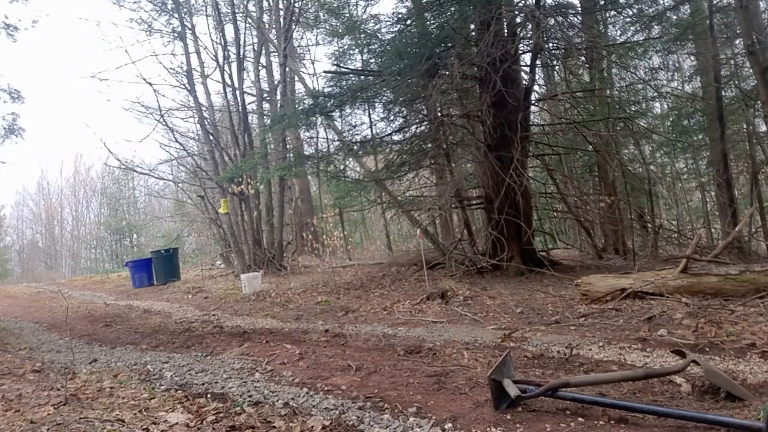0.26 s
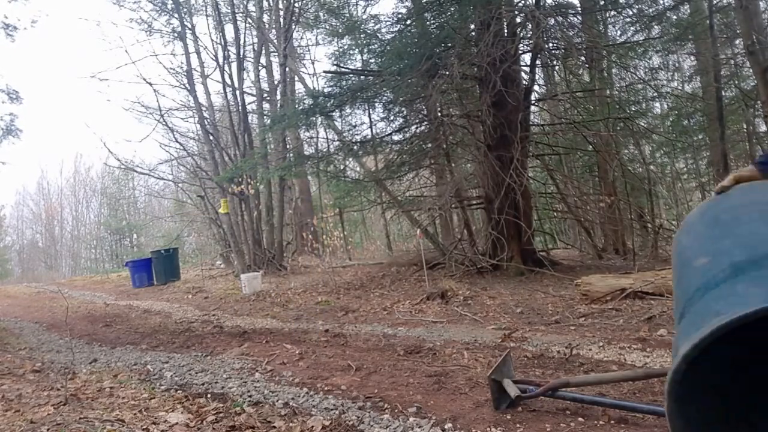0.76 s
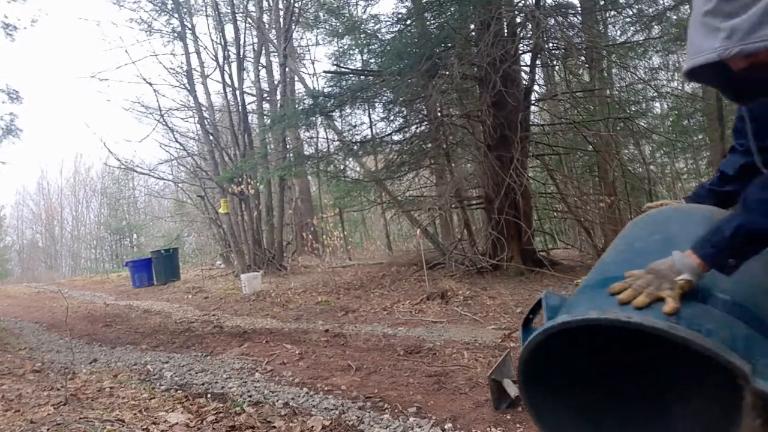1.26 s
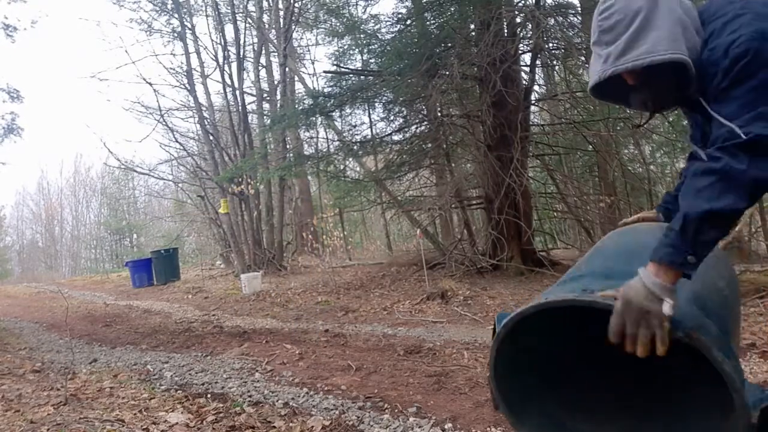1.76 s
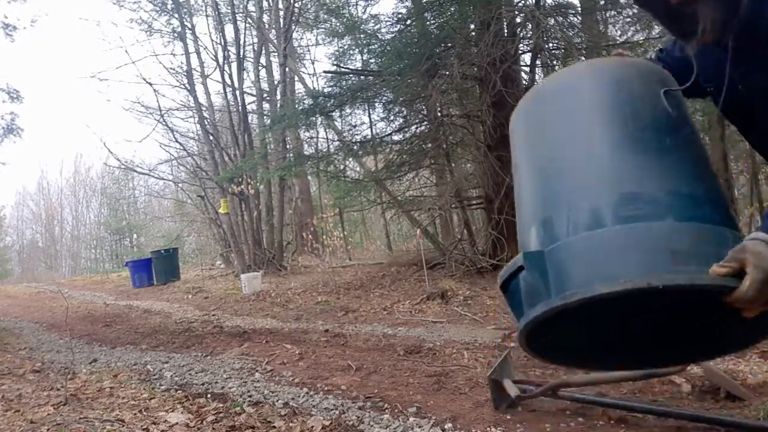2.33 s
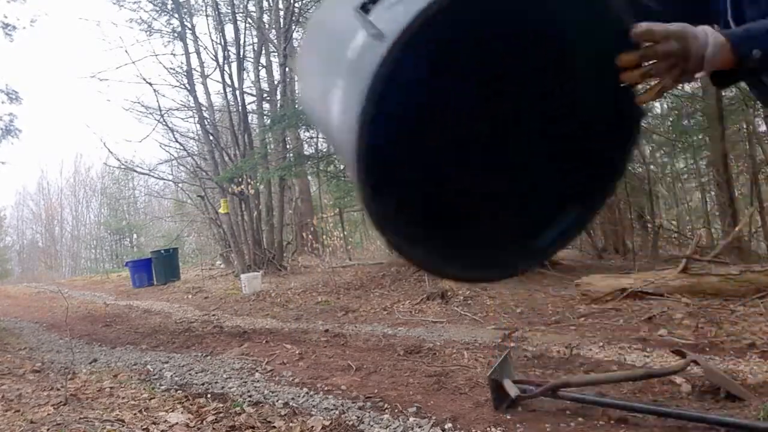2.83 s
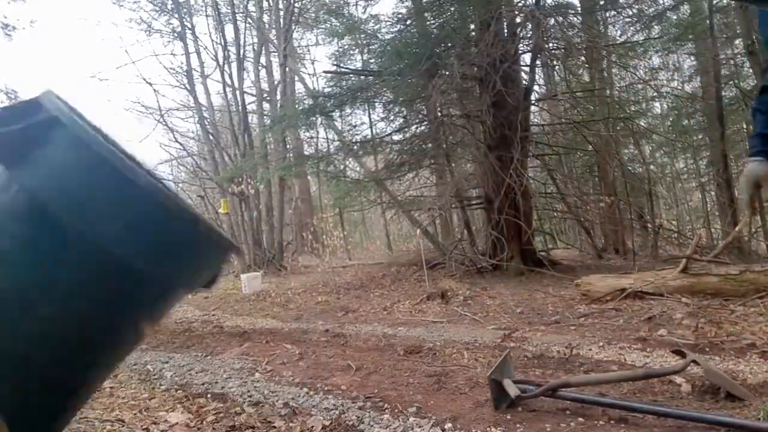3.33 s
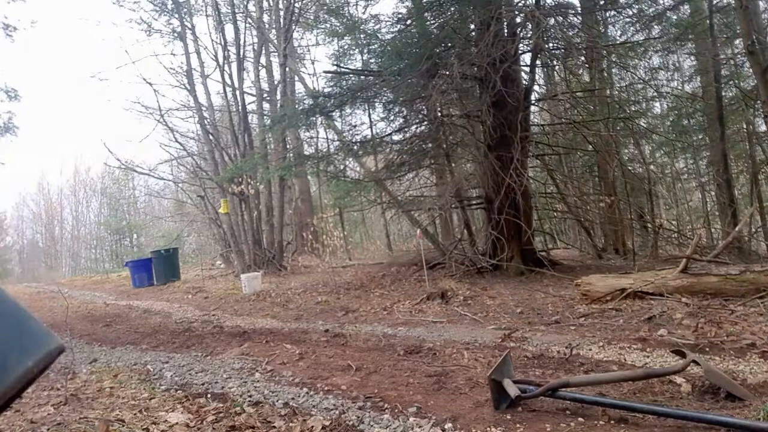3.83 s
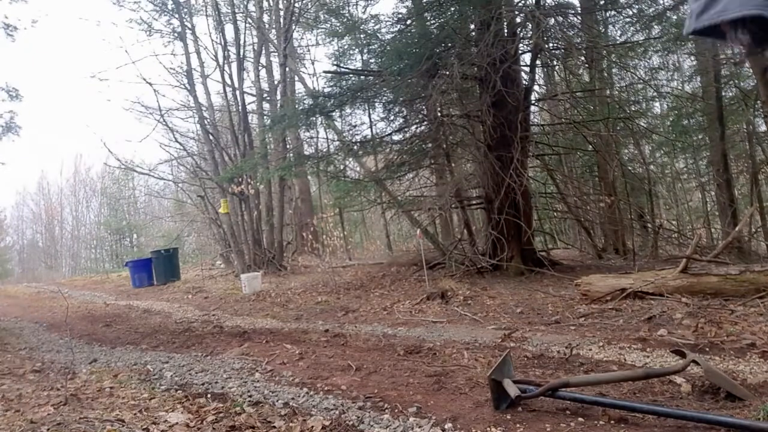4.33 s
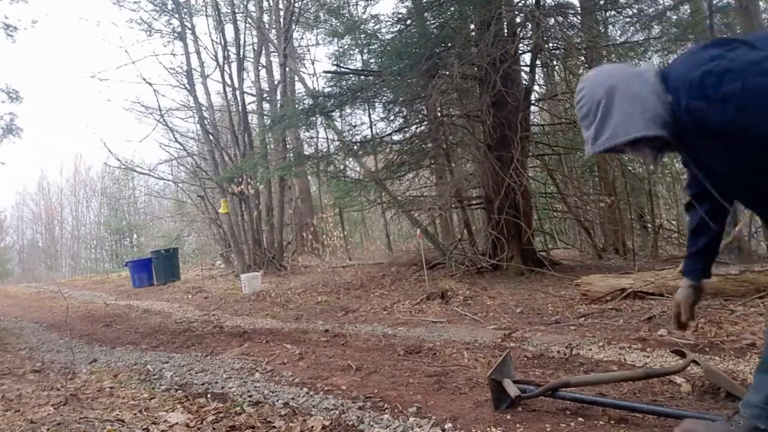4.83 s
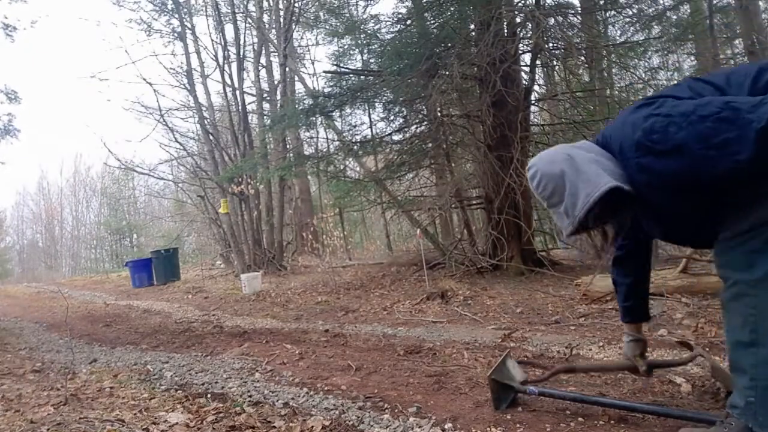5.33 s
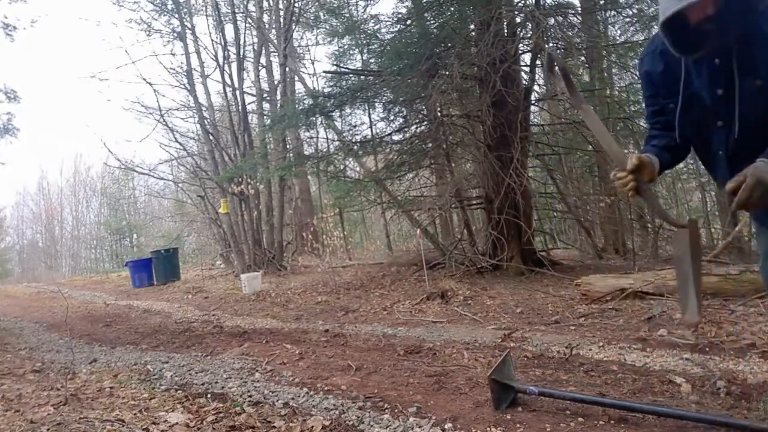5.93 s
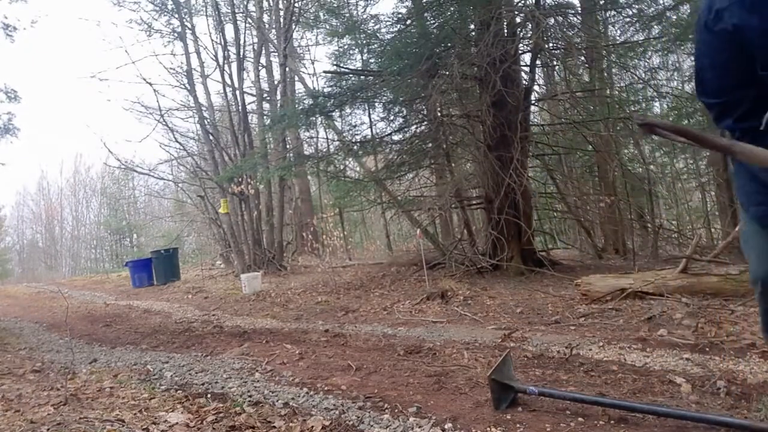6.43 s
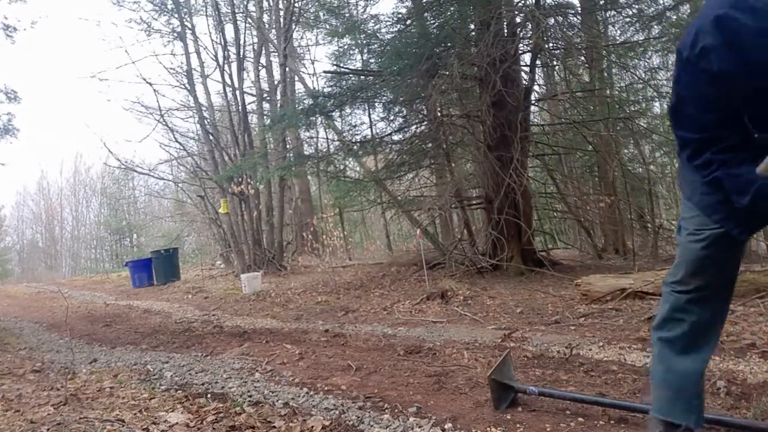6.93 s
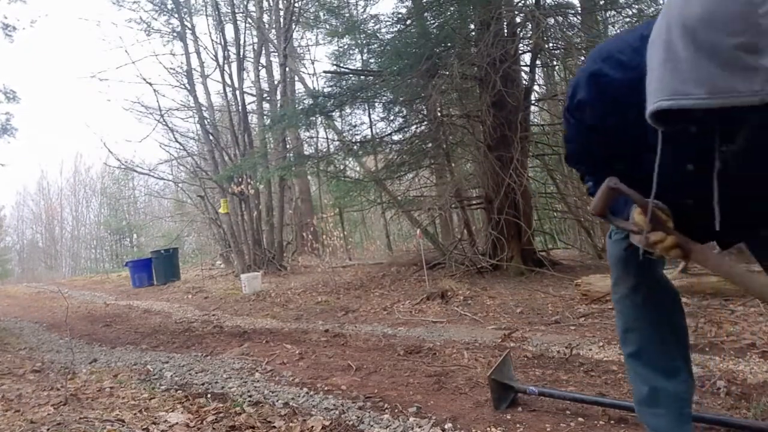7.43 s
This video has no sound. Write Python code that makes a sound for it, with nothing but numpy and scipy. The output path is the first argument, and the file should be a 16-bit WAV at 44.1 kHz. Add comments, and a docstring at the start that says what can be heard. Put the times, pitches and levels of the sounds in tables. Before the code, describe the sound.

Outdoors by woods, close stereo microphone. Gravel slides and drums inside a large plastic barrel, hissing out of its mouth for about two seconds. A short lull, then the barrel is thrown and lands with a loud hollow boom and slap. Dry leaves crackle under it and under boots, with small clicks. A shovel knocks in gloved hands, then stabs and scrapes gravel with ringing steel and pinging stones. Light wind underneath.

```python
"""A big plastic barrel is tipped and dragged so that gravel slides out, then it is tossed aside.
The gravel is thousands of tiny random impacts: some drum on the wall, others hiss out of the mouth.
The barrel lands with a boom of swelling notes and rolls on; crackling noise makes the leaves under it and the boots.
A steel shovel knocks, then stabs and scrapes through gravel: bursts of grit, ringing steel and pinging stones.
Behind it are light wind, puffs of air and a weak echo from trees; two microphone ports hear it all."""
import sys
import numpy as np
from scipy import signal
from scipy.fft import rfft, irfft, next_fast_len
from scipy.io import wavfile
from scipy.ndimage import map_coordinates

SR = 44100
rng = np.random.default_rng(int(sys.argv[2]) if len(sys.argv) > 2 else 0)


def persist_wave(psi):
    """Save psi, clipped to +-1, as 16-bit WAV."""
    counts = np.round(np.clip(psi, -1, 1) * 32767).astype(np.int16)
    wavfile.write(sys.argv[1], SR, np.atleast_2d(counts).T)


N = 339129  # length of the scene [samples]


# gravel sliding out, before each layer is lifted and flickers:
# (time [s], drumming level [dB], hiss level [dB])
POUR = [(0.0, -29, -34), (0.324, -50.5, -47.5), (0.434, -40.5, -47.5), (0.602, -34, -32.5),
        (0.686, -33.5, -30.5), (0.904, -28, -37), (1.062, -36, -41.5), (1.088, -31.5, -41),
        (1.19, -33.5, -38.5), (1.428, -22.5, -30.5), (1.66, -39.5, -38.5), (1.826, -52, -55.5),
        (1.88, -50.5, -58)]
# colour of the stones' hiss: (frequency [Hz], level [dB])
HISS = [(600, 0), (2200, -1), (3200, 0.5), (5800, 1), (7800, 7), (10500, -1), (14000, 1.5)]


def pour():
    """Gravel slides along the wall, which drums, and hisses out of the mouth as stones hit stones."""
    stones = chatter(grains(rate=8000, spread_db=5.5, scatter_ms=.06), t60=.012, share=.55)
    hiss = unit(through(stones, response(HISS)))
    hiss_flicker = amp(6 + 1.2 * wobble(41.57))
    drum_flicker = amp(2.0 + 1.4 * wobble(34.24))
    drum = drumming(t60=0.17, ring_db=-2.5)
    return level(POUR, 2) * hiss_flicker * hiss + level(POUR, 1) * drum_flicker * drum


# colour of small taps on the hollow barrel: (frequency [Hz], level [dB])
HOLLOW = [(50, -15), (115, -1), (180, -11), (300, -3), (520, -5), (780, -4), (1050, -9.5), (1500, -11),
          (2300, -15.5), (5000, -26.5)]
# pitches at which the barrel's wall rings: (frequency [Hz], relative level [dB])
WALL_MODES = [(295, 1), (455, 7), (520, 5.5), (585, 6.5), (712, 3.5), (880, 1), (1250, -4), (1560, 1.5)]
WALL_DRIFT_S = .003  # size of the random time shifts that bend the wall's pitch [s]


def drumming(t60, ring_db):
    """Small stones drum on the barrel; its ringing pitches drift as the wall flexes."""
    taps = chatter(grains(rate=1100, spread_db=2.0, scatter_ms=0.026), t60=0.048, share=0.036)
    slips = grains(rate=350, spread_db=4, scatter_ms=.026)
    steady_ring = through(slips, ringing(WALL_MODES, t60))
    # reading the ring a little early or late bends its pitch
    now = np.arange(N)
    flexed = now + WALL_DRIFT_S * SR * wobble(8)
    ring = np.array([np.interp(flexed, now, port) for port in steady_ring])
    hollow = unit(through(taps, response(HOLLOW)))
    return unit(hollow + amp(ring_db) * unit(ring))


# the plastic wall slapping the ground or being shoved: (time [s], level [dB], time to fall 60 dB [s])
SLAPS = [(2.825, -44, 0.068), (3.1973, -30, 0.12), (3.2042, -14, 0.13), (3.25, -27.5, 0.24),
         (3.588, -35, 0.15), (4.224, -36, 0.26)]
# colour of a slap on plastic: (frequency [Hz], level [dB])
SLAP_COLOUR = [(90, -22.5), (330, 0.5), (450, -14.5), (620, -9), (900, -20), (1400, -19.5), (2200, -24),
               (4000, -22.5), (7500, -27.5), (10500, -41), (14000, -34)]


def slaps():
    """The plastic wall slaps down: a sharp contact, then noise that dies away."""
    return blows(SLAPS, SLAP_COLOUR, snap=2.1, rattle=0.15)


# the air in the barrel booms as the wall is pushed:
# (time [s], peak level [dB], pitch [Hz], time to swell [s])
BOOMS = [(1.088, -24, 113, 0.01), (1.287, -24, 112.6, 0.023), (2.823, -18.5, 102, .011),
         (2.867, -23.5, 99, 0.0085), (3.2038, -5, 115.2, 0.021), (3.267, -4.5, 115, 0.01),
         (3.327, -21, 117.3, 0.017), (3.597, -30.5, 119, 0.01), (3.773, -29.5, 132, 0.011)]
# pitches at which a slap bends the wall:
# (frequency [Hz], level added to the scaled slap level [dB], time to swell [s])
FLEX_MODES = [(79.8, 6, 0.014), (177.3, 0.5, 0.017), (310, -8, 0.012), (425, -6, 0.008),
              (525.4, 0.5, 0.0071), (634.3, 6.5, 0.0042), (740, -2, .005), (942, -4.5, 0.0069),
              (1555, -4.5, 0.0044)]
FLEX_GROWS = 1.28  # bending per slap level [dB per dB]


def booms():
    """Each shove sets the air inside swinging; a hard slap also bends the whole wall."""
    pair = notes(BOOMS)
    bending = sum(swelling(db, hz, swell, waver=0.15) for hz, db, swell in FLEX_MODES)
    for s, db, _ in SLAPS:
        add(pair, s, amp(FLEX_GROWS * db) * bending)
    return pair


# hard things striking the barrel's rim:
# (time [s], crack level [dB], wall knock level [dB], rim ring level [dB])
KNOCKS = [(2.0868, -8, -32, -34), (3.3272, -11.5, -38.5, -15), (4.226, -13.5, -33, -38)]
# colour of a hard crack, here and in the shovel's jolts: (frequency [Hz], level [dB])
CRACK_COLOUR = [(200, 2.5), (700, -32.5), (1300, -1), (3000, 6), (4600, 2), (5700, 3.5), (8000, 5.5),
                (10500, -8), (14000, 0)]
# colour of the dull knock, here and in the shovel's jolts: (frequency [Hz], level [dB])
KNOCK_COLOUR = [(60, -7), (170, 1), (300, -2), (550, 1.5), (900, -9.5), (1400, -11.5), (4000, -15)]
# pitches at which the rim rings: (frequency [Hz], relative level [dB], time to swell [s])
RIM_MODES = [(678, -8, 0.002), (1855, -9, 0.0021), (2570, -0.5, 0.00085), (4600, -18, 0.0041)]


def knocks():
    """A hard contact cracks, rings the rim briefly and knocks the wall."""
    cracks = blows([(s, db - 16.5, .018) for s, db, *_ in KNOCKS], CRACK_COLOUR, snap=3.1, rattle=0.088)
    thuds = blows([(s, db, .08) for s, _, db, _ in KNOCKS], KNOCK_COLOUR, snap=2.2, rattle=0.034)
    rings = np.zeros((2, N))
    rim = sum(swelling(db, hz, swell, waver=0.085) for hz, db, swell in RIM_MODES)
    for s, _, _, db in KNOCKS:
        add(rings, s, amp(db) * rim)
    return cracks + rings + thuds


# the barrel, later the shovel, squeaking as it rubs:
# (time [s], level [dB], pitch [Hz], time to swell [s])
SQUEAKS = [(.173, -28, 527, 0.0052), (.22, -33, 536, 0.0043), (1.908, -38, 463, 0.016),
           (2.02, -42, 814, 0.012), (2.056, -34, 444, 0.0086), (2.934, -41.5, 477, 0.0058),
           (5.353, -27, 1520, 0.0024), (6.548, -34, 2000, 0.0045)]


def squeaks():
    """An edge sticks and slips, giving brief rough chirps of unsteady pitch."""
    return notes(SQUEAKS, waver=0.07)


# the barrel catching on stones or bumping against the hands:
# (time [s], peak level [dB], pitch [Hz], time to swell [s])
BUMPS = [(.5905, -15, 650, 0.00093), (.911, -15.5, 520, 0.001), (1.43, -23, 490, 0.0022),
         (1.904, -24.5, 503, 0.00093), (2.821, -43, 680, .006), (2.895, -43, 510, 0.0047)]


def bumps():
    """The barrel bumps and its wall rings briefly at an unsteady pitch."""
    return notes(BUMPS, waver=0.07)


# leaves and grit stirring all along under the barrel and the boots: (time [s], level [dB])
LITTER = [(2.8, -82), (3.44, -61), (3.67, -64), (4.01, -52), (4.35, -59.5), (4.55, -53.5), (4.76, -58.5),
          (5.12, -54.5), (5.6, -52.5), (6.26, -47.5), (6.85, -80)]
LITTER_CRACKLE_DB, LITTER_MURMUR_DB = 0.5, -7.5  # added to that level for each layer [dB]
# the barrel or a boot scuffing leaves and grit, before the layers flicker:
# (time of the peak [s], crackle level [dB], low rumble level [dB], rise [s], time to fall 60 dB [s])
SCUFFS = [(1.915, -62.5, -38, 0.094, 0.42), (1.987, -45, -43, 0.02, 0.24), (2.076, -57, -53.5, 0.41, 0.47),
          (2.48, -64.5, -66.5, 0.097, 0.42), (2.827, -55.5, -56, 0.071, 0.89),
          (3.028, -60.5, -58, 0.012, 0.15), (3.205, -31.5, -37.5, 0.008, 0.43),
          (3.338, -51.5, -58, 0.058, 1.1), (3.592, -42, -44.5, 0.039, 0.24),
          (3.789, -45.5, -50.5, 0.093, 0.99), (4.232, -33.5, -42.5, .09, 0.25),
          (4.44, -43.5, -50.5, 0.072, 0.24), (4.596, -41, -44, 0.054, 0.19), (4.797, -46, -56, 0.012, 0.38),
          (5.208, -48, -55, 0.11, 0.89), (5.404, -42, -55, 0.15, 0.54), (5.729, -46, -48, 0.35, 1.5),
          (5.83, -44, -46, 0.033, 0.18), (6.229, -58.5, -53, 0.29, 0.48), (6.501, -49, -65.5, 0.036, 1.3),
          (6.63, -47, -48, 0.5, 0.45)]
# colour of crackling leaves: (frequency [Hz], level [dB])
LEAVES = [(300, -40.5), (1000, -3), (1600, -2), (3000, 0.5), (5500, 2), (8000, 5), (10500, -2.5),
          (14000, 1.5)]


def roll():
    """The barrel and the boots crush dry leaves in clumps and rumble over the grit."""
    flakes = chatter(grains(rate=3000, spread_db=6, scatter_ms=.06), t60=.012, share=.5)
    crackle = unit(through(flakes, response(LEAVES))) * amp(1.8 + 1.5 * wobble(22))
    # the layers are random, so their powers add up
    power = np.outer(amp([LITTER_CRACKLE_DB, LITTER_MURMUR_DB]), level(LITTER)) ** 2
    for s, crackle_db, rumble_db, rise, t60 in SCUFFS:
        power += np.outer(amp([crackle_db, rumble_db]), surge(s, rise, t60)) ** 2
    crackle_gain, rumble_gain = np.sqrt(power)
    lumps = amp(3 * wobble(20))
    rumble = lumps * drumming(t60=0.21, ring_db=-15.0)
    return crackle_gain * crackle + rumble_gain * rumble


# stones clicking and twigs snapping: (time [s], level [dB])
CLICKS = [(0.5059, -13), (4.1222, -25), (4.24, -18.5), (4.705, -26.5), (4.833, -25), (4.904, -23.5),
          (4.9924, -25), (5.034, -22), (5.3958, -20), (6.474, -24), (6.577, -19.5)]
# colour of a click, also used for the blade's strikes: (frequency [Hz], level [dB])
STONE_COLOUR = [(300, -17), (1500, -15.5), (3000, -11), (5200, -4), (6500, -10), (7800, 2.5),
                (10500, -11.5), (14000, -2.5)]


def clicks():
    """Stones click and twigs snap: one sharp contact with a very short tail of noise."""
    return blows([(s, db - 8, .007) for s, db in CLICKS], STONE_COLOUR, snap=5, rattle=.06)


# strokes of the blade, a stab and then a long push with two shoves, before the layers are scaled:
# (time of the peak [s], level [dB], rise [s], hold [s], time to fall 60 dB [s])
STROKES = [(6.874, -28, 0.011, 0.043, 0.23), (7.242, -32.5, 0.19, 0.41, 0.41),
           (7.243, -26.5, 0.091, 0.023, 0.18), (7.393, -34, 0.018, 0.023, 0.13)]
# colour of crunching grit: (frequency [Hz], level [dB])
CRUNCH = [(50, -20), (150, -9), (400, -4), (750, 0), (1200, -9.5), (2200, -8), (3200, -4.5), (6000, -7),
          (8000, -7.5), (10500, -9), (14000, -12.5)]
# pitches at which the steel blade rings: (frequency [Hz], relative level [dB])
STEEL_MODES = [(350, -3), (785, 2.5), (1950, -0.5), (5100, -6), (7400, 3), (7950, 1.5)]
SLIP_DB = 1.6  # size of the crunch's swelling and slackening [dB]
SPRAY_DB, SPRAY_RISE_S, SPRAY_T60_S = -25, 0.005, 0.055  # grit per strike: added level [dB], times [s]


def dig():
    """The blade crunches through grit, catching and slipping, and rings; loose stones tick above."""
    grit = chatter(grains(rate=5000, spread_db=4.6, scatter_ms=.03), t60=.008, share=.5)
    crunch = unit(through(grit, response(CRUNCH))) * amp(2.5) * amp(SLIP_DB * wobble(50))
    coarse = grains(rate=900, spread_db=4, scatter_ms=.02)
    steel = unit(through(coarse, ringing(STEEL_MODES, t60=.012))) * amp(-4)
    clinks = amp(-6) * pebbles(rate=110)
    push = sum((amp(db) * surge(s, rise, t60, hold)) ** 2 for s, db, rise, hold, t60 in STROKES)
    # every stone that the blade strikes sets off a spray of grit
    spray = sum((amp(db + SPRAY_DB) * surge(s, SPRAY_RISE_S, SPRAY_T60_S)) ** 2 for s, db, _ in STRIKES)
    return np.sqrt(push + spray) * (crunch + steel + clinks)


# the blade striking stones: (time [s], level [dB], pitch of the stone [Hz])
STRIKES = [(6.8712, -8, 7560), (6.876, -5, 5700), (6.8916, -6, 7570), (6.9303, -18, 5100),
           (6.9695, -15.5, 5140), (7.151, -21, 4550), (7.2387, -9.5, 7950), (7.276, -7.5, 7200),
           (7.333, -3, 8300), (7.38, -9.5, 6100), (7.3939, -8, 8260), (7.404, -4.5, 4600),
           (7.5474, -3.5, 7150), (7.5738, -9, 7830), (7.611, -8, 7360), (7.648, -11, 6660),
           (7.681, -8.5, 4100)]
PING_DB, PING_SWELL_S = -13, 0.00091  # the ping's added level [dB] and time to swell [s]


def strikes():
    """Each stone that the blade hits gives a sharp click and pings near its own pitch."""
    pair = blows([(s, db - 6, .01) for s, db, _ in STRIKES], STONE_COLOUR, snap=3.5, rattle=.06)
    for s, db, hz in STRIKES:
        add(pair, s, swelling(db + PING_DB, hz, PING_SWELL_S, waver=0.09))
    return pair


PEBBLE_HZ, PEBBLE_OCTAVES = 4100, .55  # typical pitch [Hz] and its spread [octaves]
PEBBLE_T60_S = .003  # time for a tick to fall 60 dB [s]


def pebbles(rate, spread_db=4, size=1500):
    """Loose stones, each ticking at a pitch of its own; rms 1."""
    chance = rng.random((int(rate * N / SR), 2))
    traits = np.clip(rng.standard_normal((len(chance), 2)), -2, 2)
    pair, t = np.zeros((2, N)), np.arange(size) / SR
    for (when, turn), (high, big) in zip(chance, traits):
        hz = min(PEBBLE_HZ * 2 ** (PEBBLE_OCTAVES * high), TOP_HZ)
        fade = amp(spread_db * big - 60 * t / PEBBLE_T60_S)
        clink = fade * np.sin(2 * np.pi * (hz * t + turn))
        add(pair, (size + when * (N - 2 * size)) / SR, clink)
    return unit(pair)


# the shovel jolting in the hands as it is turned round:
# (time [s], crack level [dB], level of the thud and the shaft's ring [dB])
JOLTS = [(6.268, -11.5, -34.5), (6.31, -10.5, -25), (6.374, -26, -43)]
# pitches at which the shaft rings: (frequency [Hz], relative level [dB], time to swell [s])
SHAFT_MODES = [(109, -7.5, 0.02), (173, -3.5, 0.011), (292, 0, 0.0084), (410, -4, 0.0079),
               (555, 3.5, 0.0019), (710, -9, 0.0071), (3250, -21, 0.00069)]


def jolts():
    """The shovel cracks against the grip, thuds, and its shaft rings low and short."""
    cracks = blows([(s, db - 6.0, .018) for s, db, _ in JOLTS], CRACK_COLOUR, snap=8.0, rattle=0.31)
    thuds = blows([(s, db, .12) for s, _, db in JOLTS], KNOCK_COLOUR, snap=4.3, rattle=0.019)
    rings = np.zeros((2, N))
    shaft = sum(swelling(db, hz, swell, waver=.14) for hz, db, swell in SHAFT_MODES)
    for s, _, db in JOLTS:
        add(rings, s, amp(db) * shaft)
    return cracks + rings + thuds


# the barrel's rim rasping, later gloves and sleeves on the shovel:
# (time [s], level [dB], centre frequency [Hz], time to swell [s])
RUBS = [(.001, -40, 1940, 0.015), (2.82, -52.5, 1510, 0.0036), (2.932, -55.5, 850, 0.0065),
        (5.701, -46.5, 222, 0.016), (5.823, -45, 1940, 0.0061), (6.171, -44.5, 1140, 0.011),
        (6.218, -34, 420, 0.0017)]
RUB_WIDTH = 0.27  # width of a rub's band as a share of its centre


def rubs(order=2):
    """The rim, then cloth and leather, rasp in short strokes of noise, each in a band of its own."""
    pair, t = np.zeros((2, N)), np.arange(SR // 2) / SR
    for s, db, hz, swell in RUBS:
        edges = hz * np.exp([-RUB_WIDTH / 2, RUB_WIDTH / 2])
        band = signal.butter(order, edges, "band", fs=SR, output="sos")
        # keep the end of the noise, where the filter has settled
        rasp = unit(signal.sosfilt(band, rng.standard_normal(SR)))[-len(t):]
        add(pair, s, amp(db) * hump(t, swell) * rasp)
    return pair


# light wind on the ports, before gusting and panning: (time [s], level [dB])
WIND = [(0, -53), (1.3, -41.5), (2, -41), (2.25, -58.5), (2.65, -49), (2.92, -37), (3.2, -39), (4.1, -45),
        (7.69, -52)]
WIND_SIDE_DB = 4.5  # left minus right at bearing 1: stronger on the side of the action [dB]
# single puffs of air on the ports, before panning:
# (time [s], peak level [dB], pitch [Hz], left minus right [dB])
PUFFS = [(0.327, -29, 85, -3), (2.385, -36.5, 64.3, -29.5), (2.971, -33, 76, 11), (4.589, -39.5, 84, 15.5),
         (5.052, -44, 75.6, 27), (5.291, -43.5, 69, 30), (5.724, -33.5, 140, 6), (5.765, -31, 86, 14.5),
         (6.372, -35.5, 73, 18), (6.951, -35, 65, 22)]
# colour of the wind's rumble: (frequency [Hz], level [dB])
LOW = [(20, -34.5), (45, 7.5), (75, 9), (120, 0.5), (200, -13), (500, -33.5), (3000, -100)]
# colour of the hush of the woods: (frequency [Hz], level [dB])
AIR = [(30, 6.5), (150, -8.5), (500, -20.5), (1500, -27.5), (4000, -33), (8000, -28.5), (14000, -40)]


def outdoors(apart=1.0):
    """Wind rumbles and puffs on the ports, under the faint hush of the woods."""
    # noise shared by both ports plus noise of each port's own
    low = rng.standard_normal((1, N)) + apart * rng.standard_normal((2, N))
    rumble = unit(through(low, response(LOW)))
    gusts = amp(4.2 * wobble(10) - 2.5)
    wind = level(WIND) * panned(WIND_SIDE_DB * curve(BEARING)) * gusts * rumble
    for s, db, hz, pan_db in PUFFS:
        puff = swelling(db, hz, swell=0.022, waver=0.19, order=3)
        wind[:, round(s * SR):][:, :len(puff)] += panned(pan_db) * puff
    hush = amp(-61.5) * through(rng.standard_normal((2, N)), response(AIR))
    return wind + hush


def trees(pair, t60=0.55, size=16384):
    """The trunks scatter each moment back along other paths, as a tail of fading noise."""
    echo = np.zeros((2, N + SR))
    padded = np.pad(pair, ((0, 0), (0, size)))
    # overlapping pieces, each with a fresh tail
    for start in range(0, N, size // 2):
        tail = burst(t60, channels=2)
        piece = padded[:, start:start + size] * np.hanning(size)
        answer = signal.fftconvolve(piece, tail / np.linalg.norm(tail[0]), axes=1)
        echo[:, start:start + answer.shape[1]] += answer
    return echo[:, :N]


def amp(db):
    """Decibels to gain."""
    return 10 ** (np.asarray(db) / 20)


def unit(x):
    """x at rms 1."""
    return x / np.sqrt(np.mean(x ** 2) + 1e-20)


def curve(rows, column=1):
    """A column of a table at every sample."""
    rows = np.asarray(rows)
    return np.interp(np.arange(N) / SR, rows[:, 0], rows[:, column])


def level(rows, column=1, fade=0.021):
    """Gain from a dB column, fading to silence outside its span."""
    t = np.arange(N) / SR
    inside = np.minimum(t - rows[0][0], rows[-1][0] - t)
    return amp(curve(rows, column)) * np.clip(1 + inside / fade, 0, 1)


def wobble(rate):
    """A smooth random curve, rate knots a second."""
    knots = rng.standard_normal(int(N * rate / SR) + 4)
    return map_coordinates(knots, [np.arange(N) * rate / SR])


def hump(t, swell):
    """Gain that rises to 1 at swell and dies away."""
    return t / swell * np.exp(1 - t / swell)


RISE_DB = 30  # climb within the rise time [dB]


def surge(s, rise, t60, hold=0):
    """Gain that climbs RISE_DB within rise to its peak at time s, holds, then dies away."""
    t = np.arange(N) / SR - s
    climb, fall = RISE_DB * t / rise, -60 * (t - hold) / t60
    return amp(np.clip(np.minimum(climb, fall), -120, 0))


def swelling(db, hz, swell, waver=0, order=1):
    """One note that swells and dies, its pitch more or less unsteady; a higher order starts softer."""
    t = np.arange(SR // 2) / SR
    knots = t[::SR // 600]
    drift = np.interp(t, knots, rng.standard_normal(len(knots)))
    phase = 2 * np.pi * np.cumsum(hz * (1 + waver * drift)) / SR
    return amp(db) * hump(t, swell) ** order * np.sin(phase)


def notes(rows, waver=0):
    """Swelling notes from rows of (time [s], peak level [dB], pitch [Hz], time to swell [s])."""
    pair = np.zeros((2, N))
    for s, db, hz, swell in rows:
        add(pair, s, swelling(db, hz, swell, waver))
    return pair


def burst(t60, channels=1):
    """Noise that dies away."""
    t = np.arange(SR // 3) / SR
    return rng.standard_normal((channels, len(t))) * amp(-60 * t / t60)


def blows(rows, colour, snap, rattle):
    """Rows of (time [s], level [dB], t60 [s]): a sharp contact, then a dying crush of smaller ones."""
    pair = np.zeros((2, N))
    for s, db, t60 in rows:
        contact = burst(t60)[0]
        contact[0] = snap
        add(pair, s, amp(db) * contact)
    return through(chatter(pair, t60=.02, share=rattle), response(colour))


def ringing(modes, t60):
    """Impulse response of a table of ringing pitches, all dying away together."""
    t = np.arange(SR // 3) / SR
    ring = np.zeros(len(t))
    for hz, db in modes:
        ring += amp(db - 60 * t / t60) * np.sin(2 * np.pi * hz * t + rng.uniform(0, 2 * np.pi))
    return ring


def response(points, size=4096):
    """Causal impulse response with the given (frequency [Hz], level [dB]) colour."""
    hz, db = np.transpose(points)
    grid = np.fft.rfftfreq(size, 1 / SR)
    # folding the cepstrum forward puts the energy as early as possible
    cepstrum = irfft(np.log(amp(np.interp(np.log(grid + 1), np.log(hz), db))))
    cepstrum[1:size // 2] *= 2
    cepstrum[size // 2 + 1:] = 0
    return irfft(np.exp(rfft(cepstrum)))


def through(x, ring):
    """x through an impulse response that is first scaled to energy 1."""
    ring = np.atleast_2d(ring)
    ring = ring / np.linalg.norm(ring, axis=1, keepdims=True)
    return signal.fftconvolve(x, ring, axes=1)[:, :N]


def chatter(x, t60, share):
    """Each contact trails its own short rattle, different at the two ports."""
    share, keep = np.clip(share, 0, 1), amp(-60 / (t60 * SR)) ** 2
    energy = signal.lfilter([1 - keep], [1, -keep], x ** 2)
    rattle = np.sqrt(share * energy) * rng.standard_normal(x.shape)
    return np.sqrt(1 - share) * x + rattle


# where the action is: (time [s], bearing [about -1 right to 1 left])
BEARING = [(0, -1.08), (.75, -.76), (1.5, -.52), (2.6, -0.53), (3.22, 0.26), (3.8, 0.9), (5, 0.91),
           (6.6, 0.79), (6.8, -1.17), (7.69, -0.86)]
PORT_LAG = .000385  # delay between the two ports at bearing 1 [s]


def add(pair, s, sound):
    """Mix a sound in at time s; it reaches the nearer port first."""
    lag = PORT_LAG * np.interp(s, *np.transpose(BEARING))
    for port, delay in zip(pair, (-lag / 2, lag / 2)):
        part = port[round((s + delay) * SR):][:len(sound)]
        part += sound[:len(part)]


def grains(rate, spread_db, scatter_ms):
    """Random tiny impacts of uneven size, each from a slightly different direction."""
    count = int(rate * N / SR)
    at = rng.integers(0, N, count)
    size_db = spread_db * np.clip(rng.standard_normal(count), -3, 2.6)
    size = amp(size_db) * rng.choice([-1, 1], count)
    scatter = scatter_ms / 10 ** 3 * rng.standard_normal(count)
    lag = SR * (PORT_LAG * curve(BEARING)[at] + scatter)
    left = at - np.round(lag / 2)
    right = left + np.round(lag)
    return np.array([np.bincount(np.clip(i, 0, N - 1).astype(int), size, N) for i in (left, right)])


def panned(db):
    """Left and right gains for a level difference."""
    return amp(np.array([[.5], [-.5]]) * db)


def shaded(pair, shade_db=2.5, corner_hz=2200):
    """The body between the ports makes treble stronger on the near side and weaker on the far side."""
    high_pass = signal.butter(1, corner_hz, "high", fs=SR, output="sos")
    treble = signal.sosfiltfilt(high_pass, pair)
    gain = amp(shade_db * curve(BEARING) * np.array([[1], [-1]]))
    return pair + treble * (gain - 1)


def scene():
    """All the action, with a weak answer from the trees, over the outdoor background."""
    barrel = pour() + slaps() + knocks() + squeaks() + bumps()
    ground = roll() + clicks()
    shovel = dig() + strikes() + jolts() + rubs()
    near = shaded(barrel + ground + shovel) + booms()
    echo = amp(-23) * trees(near)
    return near + echo + outdoors()


# the right microphone port rings, then cancels: (frequency [Hz], level [dB])
RIGHT_PORT = [(5000, 0.5), (7500, 2.5), (8700, 0.5), (9600, -7.5), (10300, -18.5), (11300, -7.5),
              (13000, -0.5), (14500, -8.5)]
BASS_LEAD, BASS_LEAD_HZ = 0.5, 100  # the left port's greatest lead [radians] and its pitch [Hz]
TOP_HZ = 14700  # band limit [Hz]


def record(dry):
    """The right port colours the treble, the left one leads in the bass; the band limit cuts the top."""
    right = signal.fftconvolve(dry[1], response(RIGHT_PORT))[:N]
    ports = np.clip([dry[0], right], -1, 1)
    size = next_fast_len(N + SR // 10)
    hz = np.fft.rfftfreq(size, 1 / SR)
    lead = BASS_LEAD * np.sin(2 * np.arctan(hz / BASS_LEAD_HZ))
    turn = np.exp(1j * np.array([[.5], [-.5]]) * lead)  # half the lead for each port
    return irfft(rfft(ports, size) * turn * (hz < TOP_HZ), size)[:, :N]


dry = scene()
out = record(dry)
persist_wave(out)
```